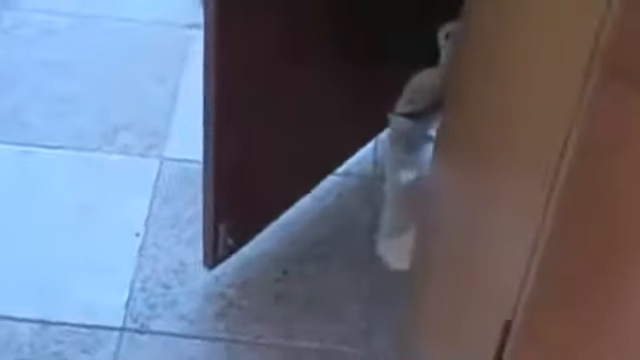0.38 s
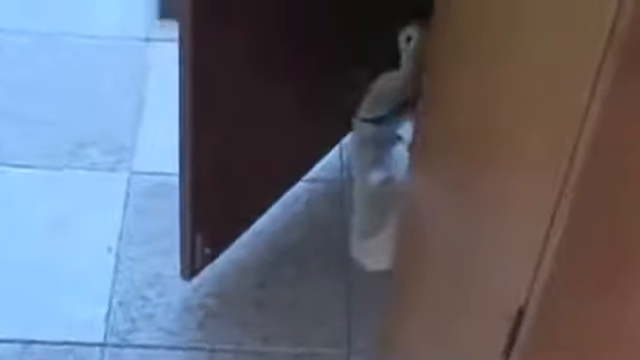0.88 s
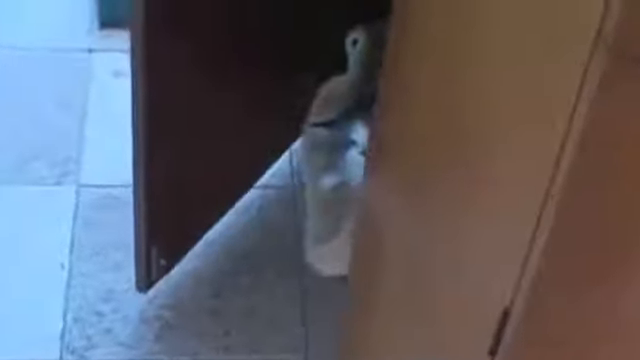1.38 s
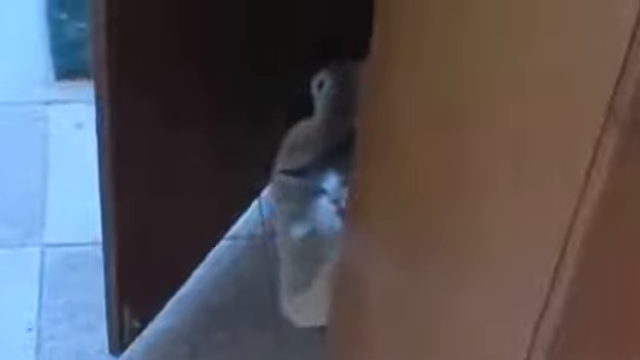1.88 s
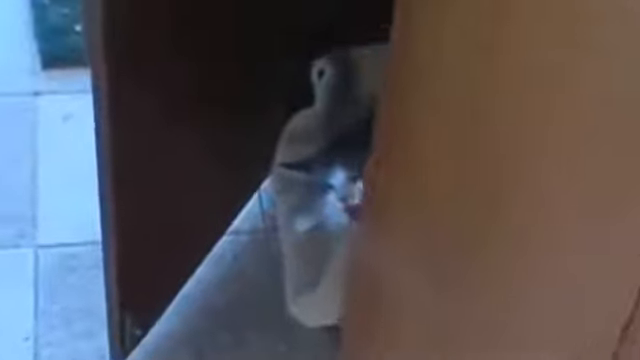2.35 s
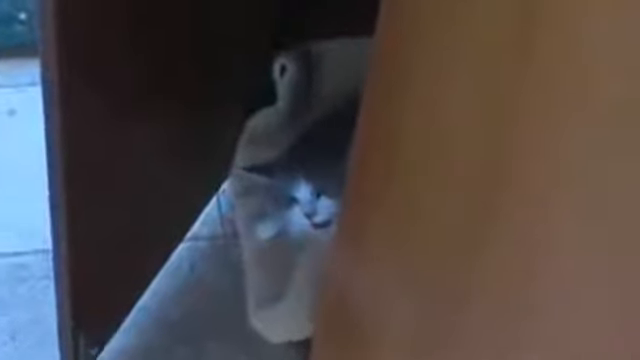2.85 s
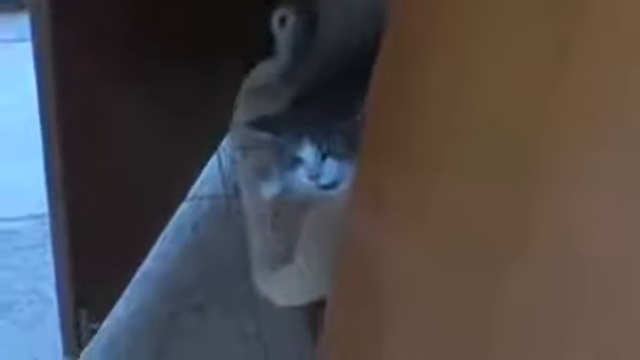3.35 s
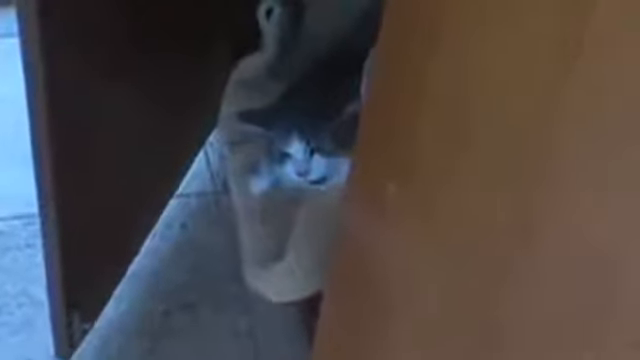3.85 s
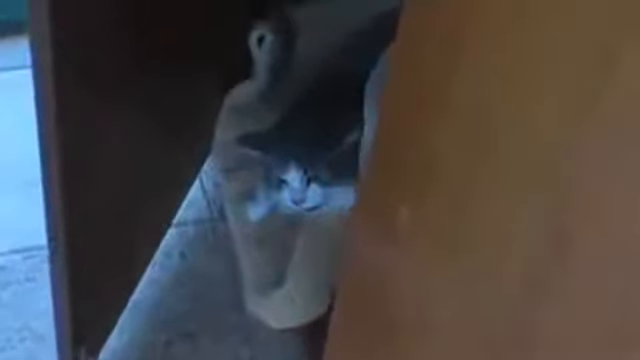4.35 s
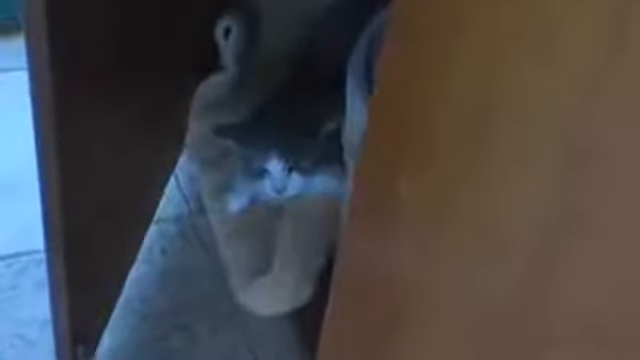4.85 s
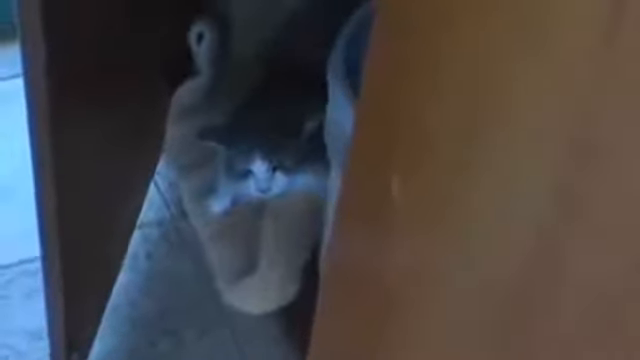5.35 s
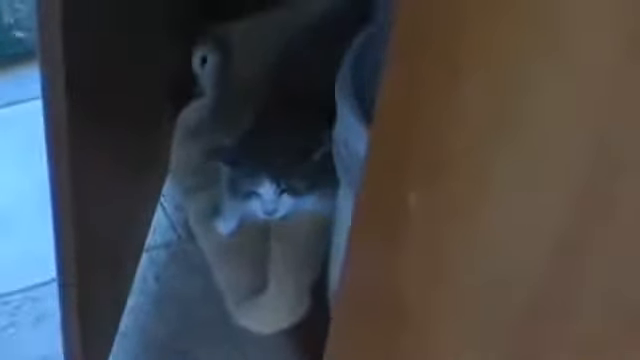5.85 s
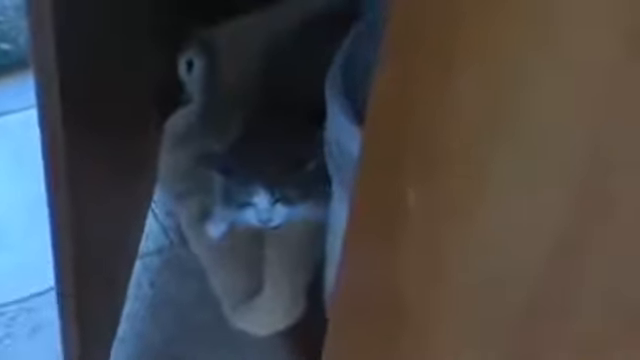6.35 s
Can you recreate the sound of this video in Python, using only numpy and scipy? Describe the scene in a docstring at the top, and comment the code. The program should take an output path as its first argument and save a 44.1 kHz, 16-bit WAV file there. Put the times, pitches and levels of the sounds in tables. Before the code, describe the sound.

A cornered cat gives one very long, strained yowl in a boxy wooden space, sinks lower, then starts a second, rising yowl cut off mid-cry.

```python
"""Faint ticks over the hush of a quiet tiled room, then a cornered cat yowls twice inside a wooden cupboard,
near a small camera. Each yowl climbs out of a creak of uneven pulses into a tone of summed partials, rough
in spells, with half lines between the partials at times; the second still sounds at the end.
Ticks and rustles are shaped bands of noise, two soft thumps are short dying cosines,
the cupboard is a decaying noise echo, and a sparse crackle and filtered noise make the background."""
import sys
import numpy as np
from scipy import signal
from scipy.fft import rfft, irfft
from scipy.io import wavfile
from scipy.ndimage import uniform_filter1d

SR = 44100
rng = np.random.default_rng(int(sys.argv[2]) if len(sys.argv) > 2 else 0)


def boost_factor(decibels):
    """Convert a level in decibels to a linear amplitude factor."""
    exponent = np.asarray(decibels, float) / 20
    return 10 ** exponent


def store_wav(level_fs):
    """Save 16-bit WAV to argv[1]."""
    pcm = np.round(np.clip(np.atleast_2d(level_fs), -1, 1) * 32767)
    wavfile.write(sys.argv[1], SR, pcm.T.astype(np.int16))


N = 285768
TIME = np.arange(N) / SR  # s


def cat():
    """The vocal folds start each yowl as a creak, then settle into clear stretches of tone."""
    # Creaky starts, one list each. Each row: time in seconds, pitch in Hz, effort in dB.
    creak_rows = [
        [(0.515, 176, -86), (0.533, 231.3, -59.5), (0.571, 308, -44.5), (0.601, 470, -49), (0.625, 455, -48)],
        [(5.88, 126, -88), (5.93, 153.3, -50), (5.962, 200.2, -41.5), (6.002, 361.7, -45.5), (6.036, 436, -49),
         (6.07, 579, -47)],
    ]
    # Colour of the throat, one list for each creak. Each row: frequency in Hz, relative level in dB.
    creak_throats = [
        [(150, -21), (700, -5), (1150, -13), (1620, 7), (2150, -8), (2750, -1), (3400, -33), (6000, -21),
         (10500, -56)],
        [(100, 19), (300, -5.5), (650, -3.5), (950, -12), (1350, -0.5), (1850, -2), (2250, -19), (2750, -5),
         (3600, -24), (4800, -23), (10500, -33)],
    ]
    # Pitch of the folds, one list for each clear stretch. Each row: time in seconds, pitch in Hz.
    pitch_rows = [
        [(0.615, 591.0), (0.64, 637.6), (0.65, 646.3), (0.66, 663.2), (0.72, 681.3)],
        [(0.722, 571.0), (0.737, 560.2), (0.747, 560.2), (0.867, 575.5), (0.907, 572.6), (0.947, 579.9),
         (0.977, 575.8), (0.987, 584.5), (1.047, 582.9), (1.127, 591.8), (1.207, 584.1), (1.267, 595.8),
         (1.307, 590.6), (1.367, 594.0), (1.397, 583.7), (1.537, 594.8), (1.637, 592.3), (1.737, 580.9),
         (1.867, 580.6), (2.097, 614.6), (2.227, 601.2), (2.277, 588.1), (2.457, 573.4), (2.477, 573.8),
         (2.527, 589.2), (2.537, 589.2), (2.547, 578.4), (2.617, 586.2), (2.967, 587.2), (3.127, 573.4),
         (3.217, 558.1), (3.427, 547.7), (3.687, 560.3), (3.907, 559.9), (4.147, 547.1), (4.297, 561.3),
         (4.427, 557.9), (4.577, 545.1), (4.717, 515.1), (4.777, 509.4), (4.817, 493.7), (4.857, 488.2),
         (5.107, 513.1), (5.257, 513.7), (5.307, 509.1), (5.317, 504.2), (5.337, 478.9), (5.368, 472.2)],
        [(6.05, 506.6), (6.085, 566.7), (6.145, 595.0), (6.175, 617.2), (6.235, 624.8), (6.325, 617.1),
         (6.345, 605.4), (6.415, 595.2), (6.49, 595.3)],
    ]
    # Throat and mouth over the same stretches. Each row: time in seconds, effort in dB,
    # lower resonance in Hz, upper resonance in Hz, nasal dip in Hz,
    # mouth opening as dB of the higher partials, ring of the mouth in Hz.
    shape_rows = [
        [(0.615, -68.5, 1610, 2530, 3060, 4, 5600.0), (0.645, -62, 2000, 2690, 2620, -5, 5900.0),
         (0.68, -63.5, 1840.0, 2720, 2370, 4, 6450), (0.72, -58, 2260.0, 3000.0, 2300.0, -5, 6640.0)],
        [(0.722, -66, 2360, 2700, 2820, 14, 5770), (0.8, -60.5, 2230, 3080, 2430, 6, 5500),
         (0.9, -55.5, 2050, 2765, 2530, -2.5, 5300.0), (1.02, -55.5, 2110.0, 2906, 2900, 0, 6240),
         (1.2, -58.5, 2320, 2910, 2630, 5.5, 6860), (1.4, -54.5, 2090, 2950, 3140, 1, 7050),
         (1.6, -56, 1980, 2840, 3150, 0.5, 6400), (1.76, -54, 1854, 2800, 3280, 0.5, 5500),
         (1.93, -54.5, 1960.0, 2874, 3230, 2.5, 5500), (2.01, -57.5, 2070, 3460, 5070, 4.5, 5970),
         (2.11, -52.5, 2260, 3450, 5400, 7.5, 5850.0), (2.23, -52.5, 2170, 3540, 5330, 9.5, 5400),
         (2.28, -50, 2363, 3340, 5500, 7.5, 5500), (2.46, -49.5, 2166, 3150, 5370, 5.5, 5600),
         (2.54, -50, 2200, 3260, 3620.0, 0.5, 5770), (2.7, -50, 2120, 3170, 3270, -2, 6100),
         (2.85, -52.5, 2110, 2830, 3220, 0, 6500), (2.98, -56.5, 2260, 2830, 2860.0, 2.5, 6500),
         (3.1, -49.5, 1940.0, 3050, 3550, -2.5, 6260), (3.2, -51.5, 1653, 3000, 4100, -1.5, 5600),
         (3.32, -52, 1540, 3120, 4030, -1.5, 4650), (3.55, -53, 1604, 2885, 4540.0, 0.5, 5300),
         (3.92, -52, 1648, 3140.0, 3930, -3, 5600), (4.18, -56, 1446, 3100, 5340, 5, 5800),
         (4.35, -50, 1530, 2940, 2810.0, 2, 6240), (4.58, -55, 1420, 2626, 2440, 2.7, 5600),
         (4.65, -54, 1550, 2940, 2950, 1.5, 5260), (4.76, -59.5, 1320, 2400, 2390, 0.5, 5730),
         (4.86, -57, 1240, 2810, 2280, 1, 5650), (4.95, -59, 1250, 2590, 2370, 1.5, 5500),
         (5.08, -62, 1605, 2260, 1750, 4, 4670), (5.25, -63, 1770, 2280, 2240, 3, 5800.0),
         (5.33, -59.5, 1260.0, 2510.0, 2120, 4.5, 5170), (5.368, -68.5, 1160, 2740.0, 2460, 14, 4930)],
        [(6.05, -61.5, 1950, 3010.0, 2870, -4.0, 4900.0), (6.09, -62, 1880, 3530, 3600, 3.5, 5400),
         (6.14, -56, 1960, 3300, 4900, 8.5, 6050), (6.18, -56.4, 2170, 3670, 5400, 7, 6200),
         (6.23, -54, 2260, 3370, 5600, 10, 6640), (6.3, -56, 2220, 3110, 5600, 13, 6700),
         (6.35, -51.5, 2273, 3530, 5130, 7, 6500), (6.49, -48.5, 2090, 3380, 4350, 5.5, 5200)],
    ]
    out = np.zeros(N)
    for rows, throat in zip(creak_rows, creak_throats):
        add(out, *creak(rows, throat))
    for pitch, shape in zip(pitch_rows, shape_rows):
        add(out, *tone(pitch, shape))
    return out


def creak(rows, throat):
    """Slow uneven pulses of the folds speed up through the throat."""
    t, (hz, effort_db) = unfold(rows)
    uneven_hz = hz * (1 + .02 * wander(len(t), hz=90))
    turns = np.cumsum(uneven_hz) / SR

    def colour_db(f):
        return read(throat, f)

    pulses = stack(turns, hz, range(1, 40), colour_db, waver_db=3, spread=.2, waver_hz=25).real
    pulses = pulses * (1 + .15 * wander(len(t), hz=300))
    return t[0], np.sqrt(2) * boost_factor(effort_db) * pulses * signal.windows.tukey(len(t), .2)


def tone(pitch, shape):
    """Clean partials, smeared by rasp and joined by half lines when every other cycle weakens."""
    # Rough spells of the folds. Each row: start in seconds, end in seconds,
    # relative rasp at the start in dB, at the end in dB.
    rasp_rows = [(.6, .7, -14, -18), (.724, .805, 2, 0), (.82, .92, -7, -7), (.935, 1.012, -5, -8),
                 (1.025, 1.4, -24, -27), (2.03, 2.12, -21, -21), (2.255, 2.49, -17, -15),
                 (2.53, 2.605, -13, -13), (2.64, 2.72, -15, -14), (2.74, 3.05, -24, -22),
                 (4.2, 4.62, -27, -19), (4.66, 5.31, -28, -19), (5.325, 5.38, 0, 2), (6.04, 6.1, -17, -22),
                 (6.15, 6.285, -17, -15)]
    # Spells in which every other cycle weakens. Each row: start in seconds, end in seconds,
    # level of the half lines at the start in dB, at the end in dB.
    split_rows = [(0.712, 1.045, -38, -48.5), (6.158, 6.3, -47, -54.5)]
    # The voice lunges as the growl breaks out. Each row: start in seconds, end in seconds,
    # added pressure relative to the voice at the start in dB, at the end in dB.
    lunge_rows = [(2.264, 2.271, 1, -23.5)]
    t, (hz,) = unfold(pitch)
    hz = uniform_filter1d(hz, size=400)
    s, *columns = np.transpose(shape)
    effort_db, lower_hz, upper_hz, dip_hz, open_db, ring_hz = (np.interp(t, s, c) for c in columns)
    turns = np.cumsum(hz * (1 + .0018 * wander(len(t), hz=30))) / SR
    low = low_partials(t, hz, turns, effort_db, lower_hz, upper_hz, dip_hz)
    high = boost_factor(effort_db + open_db) * high_partials(t, hz, turns, ring_hz)

    rasp = boost_factor(-42) + spells(t, rasp_rows)  # a trace of rasp stays in the calm voice
    scatter = torn_scatter(rasp)
    voice = sum(low[:2]) * (1 + .2 * scatter)  # the lowest two roughen least
    voice = voice + sum(low[2:5]) * (1 + scatter)
    # timing scatter smears the upper partials and eats into their clean lines
    blur = 2.6 * scatter
    voice = voice + (sum(low[5:]) + high) * (1 + blur) / np.sqrt(1 + (2.6 * rasp) ** 2)
    # air noise between the high partials
    voice = voice + boost_factor(-15) * high * flutter(len(t), hz=120, width=320)

    voice = voice * (1 + spells(t, lunge_rows))
    voice = voice + spells(t, split_rows) * half_lines(hz, turns)
    fade = np.clip(np.minimum((t - t[0]) / .012, (t[-1] - t) / .003), 0, 1)  # in 12 ms, out 3 ms
    return t[0], np.sqrt(2) * voice.real * fade


def low_partials(t, hz, turns, effort_db, lower_hz, upper_hz, dip_hz):
    """The lowest seven partials of the folds pass the throat, each flickering on its own."""
    # Spells of flicker. Each row: start in seconds, end in seconds,
    # relative flicker at the start in dB, at the end in dB.
    flicker_rows = [(.6, 1.68, -8.5, -0.5), (1.944, 2.268, -1, -6), (2.253, 2.7, -7.5, -2.5),
                    (4.55, 5.38, 5, -13), (6.04, 6.36, 1, -13)]
    slope_db_per_octave, fundamental_db, second_db = 0.55, 1.3, 3  # the second partial stands out
    flicker_hz = 17
    flicker = boost_factor(-17) + spells(t, flicker_rows)
    low = []
    for k in range(1, 8):
        source_db = effort_db + slope_db_per_octave * np.log2(k)
        source_db = source_db + fundamental_db * (k == 1) + second_db * (k == 2)
        level_db = source_db + throat_db(k * hz, lower_hz, upper_hz, dip_hz) + cancelled_db(t, k * hz)
        # the fundamental and the partials near the lower resonance hold steadiest
        off_peak = .31 if k == 1 else np.clip(abs(k * hz - lower_hz) / 900, .3, 1)
        depth = off_peak * flicker
        stray = wander(len(t), flicker_hz) + 1j * wander(len(t), flicker_hz)
        unsteady = (1 + depth * stray / np.sqrt(2)) / np.sqrt(1 + depth ** 2)
        wave = np.exp(2j * np.pi * (k * turns + .6 * rng.random()))
        low.append(boost_factor(level_db) * unsteady * wave)
    return low


def high_partials(t, hz, turns, ring_hz):
    """The mouth cavity colours the partials from the eighth up and lifts those near its ring."""
    # Colour of the higher partials. Each row: frequency in Hz, relative level in dB.
    mouth_rows = [(2240, -30), (3800, 2.5), (6600, -2.5), (7080, -0.5), (7400, -8), (9000, -11),
                  (9540, -18.5), (11000, -15.5), (14300, -47), (22000, -120)]

    def mouth_db(f):
        ring_db = 7 * np.exp(-((f - ring_hz) / 500) ** 2)
        return read(mouth_rows, f) + ring_db + cancelled_db(t, f)

    return stack(turns, hz, range(8, 23), mouth_db, waver_db=2.8, spread=1, waver_hz=8)


def torn_scatter(rasp):
    """Slack tissue flaps against the folds and puts noisy side bands round each partial."""
    count = len(rasp)
    flap_hz = 213.8
    half_flap = np.exp(1j * np.pi * np.cumsum(flap_hz * (1 + 0.089 * wander(count, hz=31.3))) / SR)
    flap = half_flap ** 2 + 1.4 / half_flap  # the slower half pulls a band below each partial
    scatter = rasp * (.6 * flap + .65 * flutter(count, hz=160, width=260))
    return scatter * boost_factor(2.1 * wander(count, hz=45) - .5)  # the rasp comes in torn grains


def half_lines(hz, turns):
    """A weakened every other cycle puts lines halfway between the partials."""
    # Colour of the in-between lines. Each row: frequency in Hz, relative level in dB.
    half_rows = [(250, -26), (850, -12), (1420, -9.5), (2000, 3.5), (2600, -4.5), (3200, -4.5),
                 (3800, -5.5), (4600, -14), (5600, -16), (7000, -16.5), (10800, -30.5)]

    def colour_db(f):
        return read(half_rows, f)

    halves = stack(turns, hz, np.arange(.5, 18), colour_db, waver_db=2.5, spread=1, waver_hz=12)
    return halves * (1 + .2 * flutter(len(hz), hz=60, width=150))


def throat_db(f, lower_hz, upper_hz, dip_hz):
    """Two moving resonances, a fixed third above them, and the dip of the nasal side branch."""
    lower_width_hz, upper_width_hz, dip_width_hz = 176, 151, 600
    third_hz, third_width_hz, third_db = 4330, 275, 15
    peaks = resonance_db(f, lower_hz, lower_width_hz) + resonance_db(f, upper_hz, upper_width_hz)
    third = third_db * np.exp(-((f - third_hz) / third_width_hz) ** 2)
    return peaks - resonance_db(f, dip_hz, dip_width_hz) + third


def resonance_db(f, hz, width_hz):
    """Gain of one resonance of an air tube."""
    return -10 * np.log10((1 - (f / hz) ** 2) ** 2 + (f * width_hz / hz ** 2) ** 2)


def cancelled_db(t, f):
    """An echo off the cupboard wall cancels narrow bands for a while; loss of a partial inside one."""
    # Each row: start in seconds, end in seconds, centre in Hz, width in Hz, gain at the centre in dB.
    cancel_rows = [(.7, 2.41, 1181, 10, -6), (.7, 1.7, 3036, 8, -25), (1.054, 1.95, 4680, 170, -5),
                   (1.6, 1.97, 3500, 74, -16), (2.033, 2.4, 1224, 10, -10.5), (3.098, 4.2, 3900, 120, -3.5),
                   (3.21, 4.112, 2240, 120, -6), (3.2, 4.597, 7020, 250, -17), (3.394, 3.492, 2740, 60, -8),
                   (3.5, 4.496, 5580, 150, -7.5), (4.573, 4.877, 2050, 110, -20)]
    edge_s = 0.064
    loss_db = 0
    for start, end, hz, width, db in cancel_rows:
        presence = np.clip(np.minimum(t - start, end - t) / edge_s + .5, 0, 1)
        loss_db = loss_db + db * presence * np.exp(-((f - hz) / width) ** 2)
    return loss_db


def spells(t, rows):
    """Gain of passing spells that set in within a short edge and die away."""
    edge_s, tail_s = .012, .013
    gain = 0
    for start, end, start_db, end_db in rows:
        level = boost_factor(np.interp(t, (start, end), (start_db, end_db)))
        onset = np.clip((t - start) / edge_s + .5, 0, 1)
        gain = gain + level * onset * np.exp(-np.maximum(t - end, 0) / tail_s)
    return gain


def stack(turns, hz, orders, colour_db, waver_db, spread, waver_hz):
    """Partials of one oscillator under a colour, each swelling on its own; spread blurs the pulse."""
    out = 0
    for k in orders:
        level_db = colour_db(k * hz) + waver_db * wander(len(hz), hz=waver_hz)
        wave = np.exp(2j * np.pi * (k * turns + spread * rng.random()))
        out = out + boost_factor(level_db) * (k * hz < 10900) * wave
    return out / np.sqrt(uniform_filter1d(abs(out) ** 2, size=1500) + 1e-20)  # running rms 1


def ticks():
    """Ticks close to the microphone: snaps of banded noise that die within milliseconds."""
    # Each row: time in seconds, peak in dB, centre in Hz, width in Hz.
    tick_rows = [(.115, -55, 2000, 1500), (.134, -36, 1150, 600), (.135, -41, 3500, 8000),
                 (.384, -50, 4000, 5000), (5.392, -49, 5500, 5000), (5.408, -47, 6000, 5000),
                 (5.507, -38, 4000, 6000), (5.86, -54, 3000, 4000)]
    out, t = np.zeros(N), TIME[:1024] - TIME[256]
    for s, db, hz, width in tick_rows:
        burst = rng.standard_normal(len(t)) * (t >= 0) * np.exp(-abs(t) / .0012)
        snap = band(burst, hz, width)
        add(out, s + t[0], boost_factor(db) * snap / abs(snap).max())
    return out


def rustles():
    """Rustles close to the microphone: banded noise that swells and fades."""
    # Each row: middle in seconds, length in seconds, level at the middle in dB, centre in Hz, width in Hz.
    rustle_rows = [(0.022, 0.17, -58.5, 4420, 8150), (0.162, 0.07, -55.5, 1060, 1000),
                   (1.315, 0.025, -60, 7800, 5000), (4.28, 0.2, -53, 1820, 2564),
                   (4.652, .06, -52, 6030, 6660), (5.35, 0.079, -52.5, 5130, 2210),
                   (5.952, 0.0072, -47, 7240, 5000), (5.965, 0.068, -56, 4800, 3000)]
    out, t = np.zeros(N), TIME[:8192] - TIME[4096]
    for s, length, db, hz, width in rustle_rows:
        noise = evened(band(rng.standard_normal(len(t)), hz, width))
        add(out, s + t[0], boost_factor(db) * noise * np.exp(-8 * (t / length) ** 2))
    return out


def thumps():
    """Soft thumps through the camera body: a few overlapping cosine pulses."""
    # Each row: middle in seconds, peak in dB, frequency in Hz, half length in seconds.
    thump_rows = [(4.289, -30.5, 338, 0.0014), (4.361, -34, 322, 0.0039), (4.377, -29.5, 162, 0.0084),
                  (4.38, -31, 428, 0.0026)]
    out, t = np.zeros(N), TIME[:2048] - TIME[1024]
    for s, db, hz, half in thump_rows:
        add(out, s + t[0], boost_factor(db) * np.cos(2 * np.pi * hz * t) * np.exp(-(t / half) ** 2))
    return out


def cupboard(x):
    """Dense dying reflections of the wooden box and tiled floor."""
    t60_s, level_db = .22, -15
    t = TIME[:SR // 2]
    tail = rng.standard_normal(len(t)) * boost_factor(-60 * t / t60_s) * (t > .003)
    return boost_factor(level_db) * signal.fftconvolve(x, tail / np.linalg.norm(tail))[:N]


def crackle():
    """Sparse faint pricks in the treble, at random times."""
    mean_per_s, faintest_db = 12, -66
    chance, size = rng.random(N), rng.exponential(1, N)
    clicks = (chance < mean_per_s / SR) * boost_factor(3 * np.minimum(size, 2.5))
    prick = band(rng.standard_normal(256) * np.exp(-TIME[:256] / 0.0024), hz=5500, width=5300)
    return boost_factor(faintest_db) * signal.fftconvolve(clicks, prick / abs(prick).max())[:N]


def hush():
    """Room rumble and microphone hiss: noise shaped in the spectrum, slightly patchy."""
    # Each row: frequency in Hz, relative density in dB per Hz.
    hush_rows = [(12, -54), (20, -20), (43, -2.5), (161, -4.5), (320, -15.5), (346, -18), (395, -15.5),
                 (706, -19), (1080, -21), (1370, -24.5), (1780, -27), (2030, -28.5), (11000, -41.5),
                 (14300, -90.5), (22000, -120)]
    rms_db = -55
    frames, hz = N // 256 + 5, np.fft.rfftfreq(1024, 1 / SR)
    a, b, patches = rng.standard_normal((frames, 513, 3)).T
    patches = uniform_filter1d(patches, size=14, axis=0)  # over frequency
    patches = evened(uniform_filter1d(patches, size=12, axis=1))  # over time
    spectrum = (a + 1j * b) * boost_factor(read(hush_rows, hz)[:, None] + .9 * patches)
    noise = signal.istft(spectrum, nperseg=1024, noverlap=768)[1][:N]
    return boost_factor(rms_db) * evened(noise)


def flutter(count, hz, width):
    """Complex noise of rms 1 gathered around plus and minus hz."""
    a = band(rng.standard_normal(count), hz, width)
    b = band(rng.standard_normal(count), hz, width)
    return evened(a + 1j * b)


def wander(count, hz):
    """Smooth random drift of rms 1 up to about hz."""
    lowpass = signal.butter(2, hz, fs=SR, output="sos")
    return evened(signal.sosfilt(lowpass, rng.standard_normal(count + 4000))[4000:])


def band(x, hz, width):
    """Gaussian band of the spectrum."""
    f = np.fft.rfftfreq(len(x), 1 / SR)
    return irfft(rfft(x) * np.exp(-2 * ((f - hz) / width) ** 2), len(x))


def evened(x):
    """Scales to rms 1."""
    return x / np.sqrt(np.mean(abs(x) ** 2) + 1e-20)


def read(points, hz):
    """Reads a spectrum on a log-frequency axis."""
    f, value = np.transpose(points)
    return np.interp(np.log(hz + 1), np.log(f + 1), value)


def unfold(rows):
    """Turns a curve table into time and columns at every sample."""
    s, *columns = np.transpose(rows)
    t = np.arange(s[0], s[-1], 1 / SR)
    return t, [np.interp(t, s, c) for c in columns]


def add(mix, s, sound):
    """Mixes a sound in from time s, cut to the length of the mix."""
    first = round(s * SR)
    part = mix[max(first, 0):][:len(sound) + min(first, 0)]
    part += sound[max(-first, 0):][:len(part)]


def scene():
    """The cat and the small sounds with their cupboard echo, over the crackle and the room."""
    near = cat() + ticks() + rustles() + thumps()
    return (near + cupboard(near) + crackle() + hush())[None]


def band_limit(x):
    """A steep low-pass at the top of the band."""
    return signal.sosfilt(signal.butter(12, 11260, fs=SR, output="sos"), x)


def record(dry):
    """The finished mix as the camera stores it."""
    return band_limit(dry)


dry = scene()
out = record(dry)
store_wav(out)
```